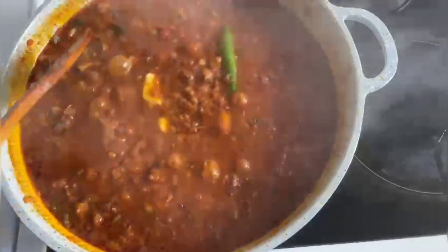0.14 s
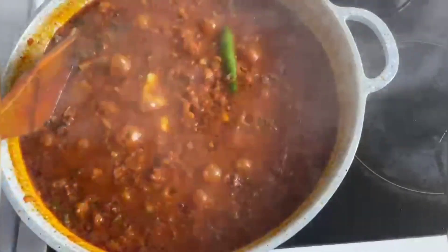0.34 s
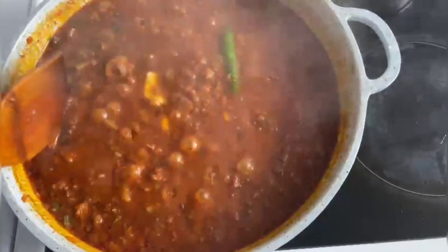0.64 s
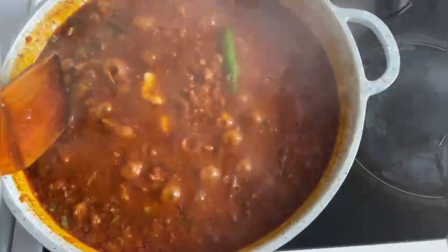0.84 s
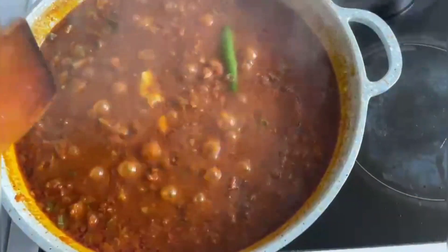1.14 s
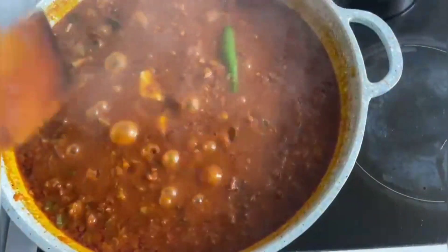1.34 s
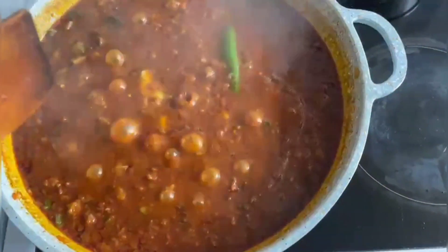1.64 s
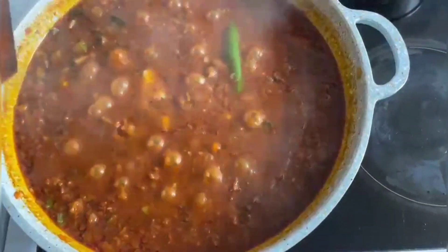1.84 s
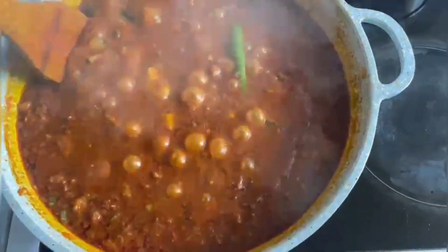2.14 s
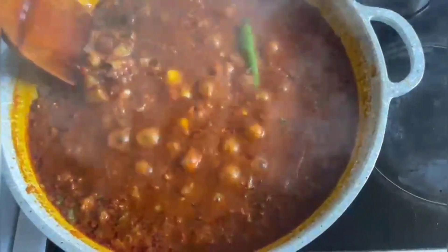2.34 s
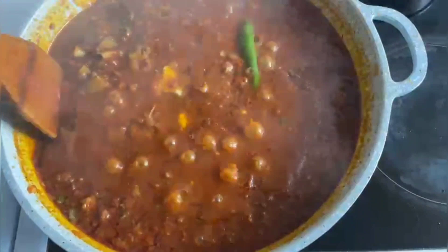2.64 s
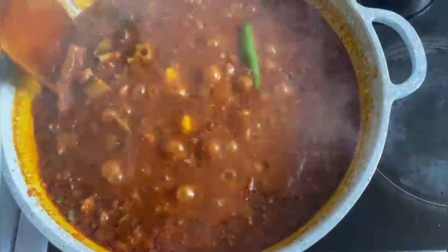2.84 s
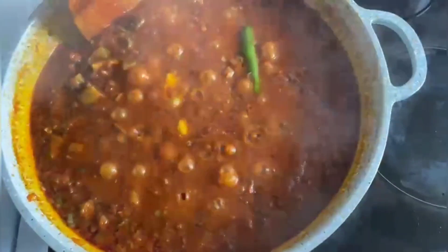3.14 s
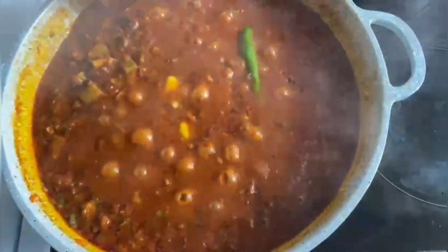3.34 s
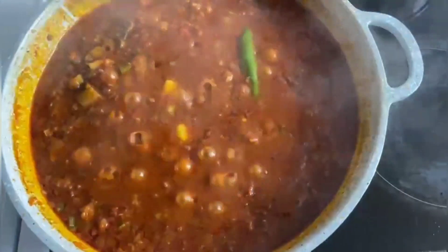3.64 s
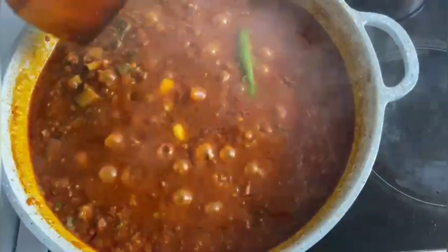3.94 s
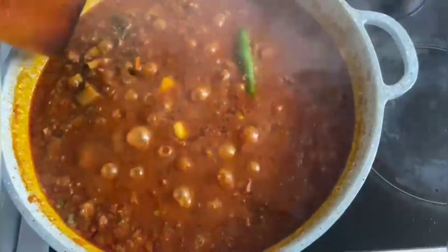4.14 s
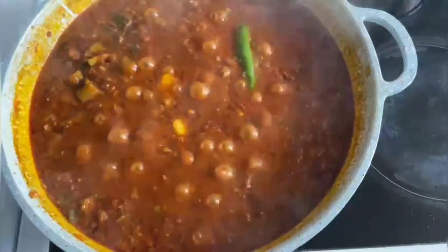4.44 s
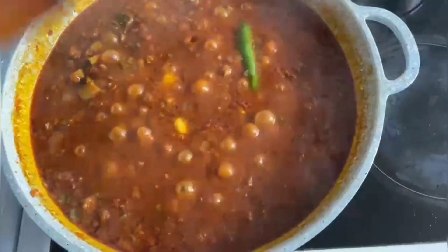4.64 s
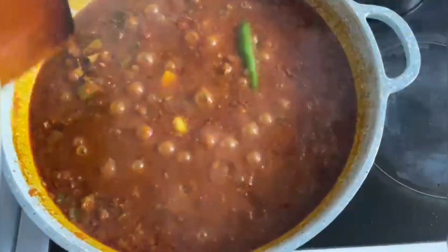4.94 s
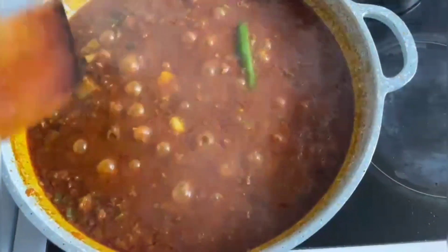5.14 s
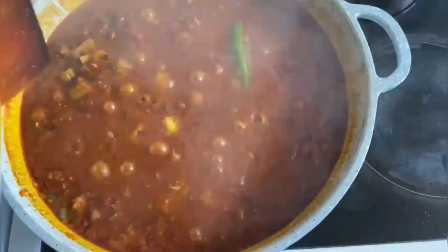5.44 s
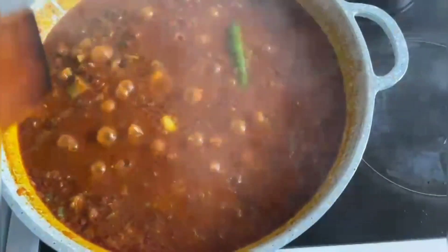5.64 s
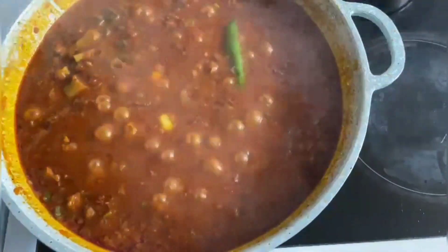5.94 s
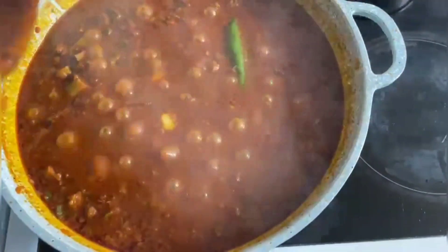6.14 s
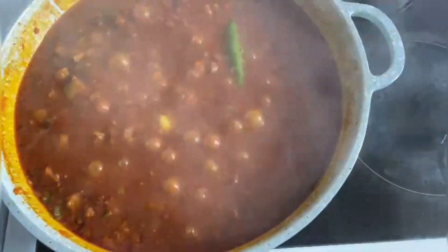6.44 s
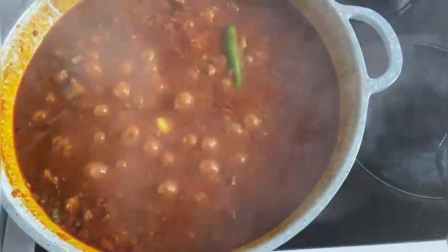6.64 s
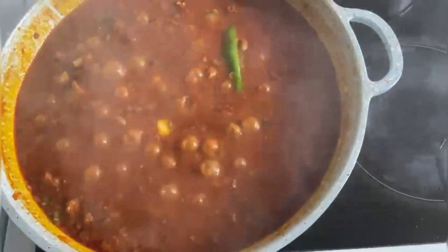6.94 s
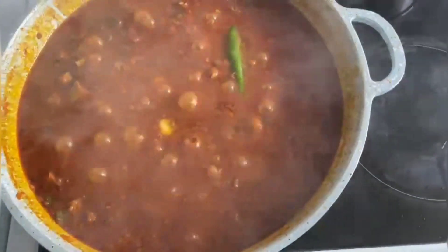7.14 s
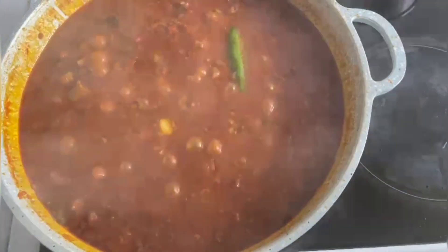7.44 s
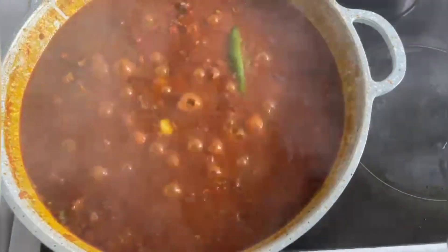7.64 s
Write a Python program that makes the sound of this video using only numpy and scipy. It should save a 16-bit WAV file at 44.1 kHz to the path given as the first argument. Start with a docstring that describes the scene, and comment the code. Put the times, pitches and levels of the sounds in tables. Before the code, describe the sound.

A thick sauce simmers close to a stereo microphone in a small kitchen. Countless little bubbles seethe and patter without pause while larger ones burst as short, wet, damped pops at uneven intervals. Spits crackle on hot metal, mostly early on, and a few big bubbles slump in low blops around two to three seconds. A low motor hum and soft rumble of air continue beneath.

```python
"""Thick stew simmers in a wide pan, close to a two-port microphone in a small kitchen.
Bubbles burst as short damped notes, and big ones slump in a falling blop with a spray of noise.
Sauce spits and fizzes at the hot metal as noise bursts and tiny ticks, over a noise bed of seething.
The pan wall and the room throw the bursts back, and an appliance hums in its own rumble of air."""
import sys
import numpy as np
from scipy import signal
from scipy.fft import rfft, irfft, next_fast_len
from scipy.io import wavfile

SR = 44100
rng = np.random.default_rng(int(sys.argv[2]) if len(sys.argv) > 2 else 0)


def put_to_file(sound):
    """Save the sound as 16-bit audio at rate SR, in the file named by the first command-line argument."""
    columns = np.atleast_2d(sound).T  # one column per channel
    safe = np.clip(columns, -1, 1)
    whole_steps = np.round(safe * 32767)
    wavfile.write(sys.argv[1], SR, whole_steps.astype(np.int16))


N = 344403
TIME = np.arange(N) / SR  # s
TEAR = 0.5  # strength of the smack of a tearing film beside the bubble's note
TRAIL_S = 0.024  # s, spread of the smaller bursts that follow a pop or a spit


def amp(db):
    """Decibels to gain."""
    return 10 ** (np.asarray(db) / 20)


def unit(x):
    """Scales to an rms of 1."""
    return x / np.sqrt(np.mean(x ** 2) + 1e-20)


def read(points, hz):
    """Reads a table on a log-frequency axis."""
    f, value = np.transpose(points)
    return np.interp(np.log(hz + 1), np.log(f + 1), value)


def bins(x):
    """Frequencies of the spectrum of x."""
    return np.fft.rfftfreq(x.shape[-1], 1 / SR)


def colour(x, points, share=1):
    """Filters by a share of a (frequency [Hz], gain [dB]) table."""
    length = x.shape[-1]
    size = next_fast_len(length, True)
    gain = amp(share * read(points, np.fft.rfftfreq(size, 1 / SR)))
    return irfft(rfft(x, size) * gain, size)[..., :length]


def add(track, s, sound):
    """Mixes a sound into a track at time s."""
    part = track[max(round(s * SR), 0):][:len(sound)]
    part += sound[:len(part)]


def drift(per_s):
    """A random wander of rms 1, in straight lines between per_s random points a second."""
    return unit(np.interp(TIME * per_s, np.arange(4096), rng.standard_normal(4096)))


def heat(column):
    """Boiling (column 1) or frying (column 2) in dB: a slow course with brief random surges."""
    # how hard the pan works, about its average: (time [s], boiling [dB], frying [dB])
    course = np.array([(0.0, -0.5, 0), (0.8, -0.4, 1), (1.05, 0.5, 1), (2.6, 0.5, 0.6), (3.8, 0.1, 1.5),
                       (4.4, -0.7, 2.24), (6.4, -0.9, -0.1), (7.2, -0.55, 0)])
    surge_db, surges_per_s = 0.8, 45
    return np.interp(TIME, course[:, 0], course[:, column]) + surge_db * drift(surges_per_s)


def diffuse(size):
    """White noise at both ports: alike in bass and treble, mostly unrelated between, phase-shifted on the left."""
    # likeness of diffuse sound at the two ports: (frequency [Hz], likeness [0-1])
    likeness = [(40, 0.99), (100, 1), (260, 0.99), (400, 0.25), (2500, 0.05), (4300, 0.07), (5200, 1)]
    # phase of the left port behind the right in diffuse noise, negative where it leads:
    # (frequency [Hz], phase [radians])
    left_phase = [(40, 0), (500, -0.5), (1500, 0.6), (3300, 2.5), (5300, 6.5), (6200, 8), (6900, 8.5),
                  (8800, 9.5), (9900, 12.5)]
    noise = rng.standard_normal((2, next_fast_len(size, True)))
    (shared, other), hz = rfft(noise), bins(noise)
    same = np.clip(read(likeness, hz), 0, .996)
    left = shared * np.exp(-1j * read(left_phase, hz))
    right = same * shared + np.sqrt(1 - same ** 2) * other
    return irfft([left, right], noise.shape[-1])[:, :size]


def bubble(hz, cycles, glide, opening=.5, tear=0):
    """A film tears with a wet smack and the cavity rings; pitch and damping rise as the hole widens."""
    tear_s = 0.00013  # s, time scale of the smack
    turns = np.arange(int(4 * cycles / hz * SR) + 2) * hz / SR  # elapsed cycles
    swell = (1 - np.exp(-turns / opening)) * np.exp(-(turns / cycles) ** 1.5)
    pitch = 1 + glide * (np.tanh(turns / cycles) - .5)
    note = swell / swell.max() * np.sin(2 * np.pi * np.cumsum(pitch) * hz / SR)
    age = np.maximum(turns - .25, 0) / hz / tear_s  # the smack starts a quarter cycle in
    smack = np.e * age * (1 - age / 2) * np.exp(-age) * 2
    return note + tear * smack


def burst(spots, where, s, db, hz, cycles, glide, opening, tear=0):
    """Sounds each bubble on the track of its own spot in the pan; the film tears inwards or outwards."""
    out = np.zeros((spots, N))
    smacks = tear * rng.choice([-1, 1], len(s))
    own_spot = (where * spots).astype(int)
    bubbles = zip(own_spot, s, amp(db), smacks, hz, np.maximum(cycles, .5), glide)
    for spot, start, gain, smack, *shape in bubbles:
        add(out[spot], start, gain * bubble(*shape, opening, smack))
    return out


def path(lag, wall_db, room_db, wall_s=.004, size=8192, count=4):
    """From one spot to both ports: direct sound, echoes off the pan wall and hob, the kitchen's tail."""
    # kitchen reverberation: (frequency [Hz], time to fall by 60 dB [s])
    kitchen = [(1000, 0.18), (8000, 0.09)]
    port_lag = 0.00026  # s, an echo's delay between the ports reaches twice this either way
    hz = np.fft.rfftfreq(size, 1 / SR)
    near = np.exp(-2j * np.pi * hz * np.array([[lag], [0]]))
    for late, side, sign in rng.uniform(-1, 1, (count, 3)):
        delay = wall_s * (1 + 0.8005 * late) + np.array([[2 * port_lag * side], [0]])
        near = near + np.sign(sign) * amp(wall_db) * np.exp(-2j * np.pi * hz * delay)
    f, t, z = signal.stft(diffuse(size), SR, nperseg=256)
    decay = amp(-60 * t / read(kitchen, f)[:, None])
    tail = signal.istft(z * decay, SR, nperseg=256)[1][:, :size]
    tail *= np.minimum(TIME[:size] / .006, 1)  # builds up over 6 ms
    return irfft(near) + amp(room_db) * tail / np.linalg.norm(tail[0])


def heard(spots, lag, lag_spread, wall_db, room_db):
    """A row of spots across the pan, each with its own delay between the ports."""
    lags = lag * (1 + lag_spread * np.linspace(-1, 1, len(spots)))
    return sum(signal.oaconvolve(spot[None], path(own, wall_db, room_db), axes=1)[:, :N]
               for spot, own in zip(spots, lags))


def seethe(boil, fry, level_db=-51.0, flicker_db=2.0, split_hz=3000):
    """Bubbles too small to tell apart: body follows boiling, hiss frying; the top only crackles."""
    # the blended seething of countless tiny bubbles: (frequency [Hz], relative level [dB])
    spectrum = [(100, -36), (250, -5), (420, 7), (580, 1), (790, 11), (1100, -6), (3000, -11), (4200, -0.5),
                (5000, -8), (6100, -1.5), (7000, -12.5), (8600, -3), (9600, -9.5), (10800, -9),
                (11800, -16.5)]
    noise = unit(colour(diffuse(N), spectrum))
    body = signal.sosfiltfilt(signal.butter(2, split_hz, fs=SR, output="sos"), noise)
    top = colour(noise, [(6500, -40), (9000, 0)])
    hiss = noise - body - top
    boiling = amp(1.3 * boil + flicker_db * drift(70))
    crackle = amp(flicker_db * drift(130))
    return amp(level_db) * (body * boiling + (hiss * amp(1.6 * fry) + top) * crackle)


def appliance(air_db=-52.0, waver=0.14, slip=0.095, port_phase=0.052):
    """A motor's wavering hum, a little later at the left port, in a rumble of air; it dips once."""
    # tone of the motor: (frequency [Hz], level before the waver [dB rms])
    hz, db = (93.2, -49.3)
    # brief dip of the hum: (time [s], length [s], level change [dB])
    s, length, dip_db = (2.94, 0.14, -10)
    # air noise of the appliance: (frequency [Hz], relative level [dB])
    rumble = [(24, -13), (47, 0), (90, 5), (117, -0.5), (129, 10), (139, 1), (179, 7.5), (196, -12.5),
              (234, 2), (300, -5), (4000, -130.5)]
    level = amp(db + dip_db * np.exp(-(2 * (TIME - s) / length) ** 2))
    phase = 2 * np.pi * hz * TIME + slip * drift(3.8) - np.array([[port_phase], [0]])
    tone = level * np.sqrt(2) * np.sin(phase)
    air = amp(air_db) * unit(colour(diffuse(N), rumble))
    return tone * (1 + waver * drift(8.3)) + air


def simmer(spots, boil, level_db=-49.5, spread_db=1.0, ring=2.72, glide=0.18, count=4500):
    """A crowd of lesser bubbles; the large, low ones are damped most by the thick sauce."""
    # typical strength of a small bubble by its pitch: (frequency [Hz], relative level [dB])
    strength = [(170, 3), (250, -3), (340, -2.5), (450, -2.5), (580, -7.5), (720, 5), (900, 4), (1200, 3),
                (1750, 4), (2050, 0.5), (2500, 3), (4000, 3.5)]
    when, where, size, force, wetness, rise = rng.random((count, 6)).T
    hz = 170 * 24 ** (size ** .75)
    cycles = ring * (.5 + wetness) * np.minimum(hz / 1200, 2) ** .6
    stray_db = spread_db * np.minimum(-np.log(1 - force), 2.3)
    db = read(strength, hz) + stray_db + boil[(when * N).astype(int)]
    tear = TEAR * np.minimum(hz / 700, 1)  # low bubbles smack less
    out = burst(spots, where, when * N / SR, db, hz, cycles, glide * rise, opening=1.4, tear=tear)
    return amp(level_db) * out / out.sum(0).std()


def fizz(spots, fry, level_db=-55.5, spread_db=4.5, ring=2.47, count=4000):
    """Tiny bubbles frying at the rim, each a tick about a millisecond long."""
    # level of the fizzing ticks by pitch, almost silent from 6 to 9.5 kHz:
    # (frequency [Hz], relative level [dB])
    tick_level = [(2800, 17.5), (4200, 12.5), (5000, 12.5), (5600, 12.5), (6100, -32), (9500, -33),
                  (10300, 8)]
    when, where, size, force, wetness = rng.random((count, 5)).T
    hz = 2800 * 3.8 ** size
    cycles = ring * (.5 + wetness) * hz / 5000
    stray_db = spread_db * np.minimum(-np.log(1 - force), 3.0)
    db = read(tick_level, hz) + stray_db + fry[(when * N).astype(int)]
    out = burst(spots, where, when * N / SR, db, hz, cycles, np.zeros(count), opening=22.0)
    return amp(level_db) * out / out.sum(0).std()


def blips(spots, boil, level_db=-43.0, spread_db=0.4, low_hz=760, high_hz=1950,
          ring=4.54, glide=0.13, count=220):
    """Middle-sized bubbles that pop distinctly, one after another at uneven intervals."""
    when, where, size, force, wetness = rng.random((count, 5)).T
    s = (np.arange(count) + when) / count * N / SR
    hz = low_hz * (high_hz / low_hz) ** size
    db = level_db + spread_db * (2 * force - 1) + np.interp(s, TIME, boil)
    cycles = ring * (.5 + wetness)
    return burst(spots, where, s, db, hz, cycles, glide * wetness, opening=1.15, tear=TEAR)


def pops(spots, level_db=0.0, glide=0.075, trail_db=-10, trail_ring=2.4, sag_octaves=0.8, count=2):
    """The large bubbles; each tears open weaker neighbours, the later the lower as the crater widens."""
    # the loudest bursts: (time [s], note level at the pan [dB], pitch [Hz], ring length [cycles])
    loudest = [(0.038, -36.5, 1080, 5.0), (0.048, -37.5, 390, 1.3), (0.127, -33.0, 1410, 2.0),
               (0.158, -36, 1570, 2.0), (0.366, -31.5, 3280, 3.2), (0.435, -39, 990, 8.0),
               (0.457, -37.5, 1190, 8.0), (0.525, -35.0, 900, 3.2), (0.538, -34.0, 1190, 2.0),
               (0.556, -32.0, 900, 1.3), (0.557, -28.5, 3580, 3.2), (0.577, -38.5, 1430, 5.0),
               (0.668, -36, 2500, 8.0), (0.717, -36, 2110, 3.2), (0.862, -33.5, 2290, 3.2),
               (0.878, -34.5, 1580, 2.0), (0.922, -35, 2480, 3.2), (1.017, -35, 684, 1.3),
               (1.021, -34, 1580, 8.0), (1.048, -33, 990, 2.0), (1.072, -32.5, 2940, 5.0),
               (1.107, -32, 900, 1.3), (1.341, -32.5, 2270, 3.2), (1.356, -36.5, 1310, 8.0),
               (1.455, -33.5, 1190, 3.2), (1.608, -37.0, 1880, 3.2), (1.616, -38, 1720, 8.0),
               (1.679, -32.5, 1430, 3.2), (1.785, -35, 1720, 5.0), (1.796, -36, 1720, 3.2),
               (1.925, -30, 1400, 1.7), (1.937, -36, 1190, 2.0), (2.005, -33.0, 1720, 2.0),
               (2.054, -30.5, 1500, 1.2), (2.123, -36, 2070, 3.2), (2.159, -36.5, 1880, 3.2),
               (2.17, -32.5, 2490, 5.0), (2.215, -33.5, 1560, 3.2), (2.327, -27.5, 2470, 2.4),
               (2.333, -34, 2010, 1.2), (2.516, -33, 980, 1.3), (2.555, -39, 1305, 8.0),
               (2.574, -31, 900, 1.3), (2.799, -38.5, 747, 6.0), (2.823, -32, 1000, 1.3),
               (2.957, -36.5, 1720, 3.2), (3.009, -39, 2280, 8.0), (3.038, -39, 904, 8.0),
               (3.057, -38, 990, 8.0), (3.059, -29.5, 2270, 1.3), (3.129, -37, 1300, 2.0),
               (3.213, -35, 895, 2.0), (3.237, -35, 810, 1.3), (3.39, -32.5, 2680, 3.2),
               (3.404, -36.5, 1080, 2.0), (3.597, -32.5, 2730, 2.0), (3.783, -36.5, 1295, 8.0),
               (3.907, -37.5, 1880, 3.2), (4.101, -35.5, 2970, 5.0), (4.178, -35.5, 880, 3.0),
               (4.597, -34, 2700, 3), (4.665, -30.5, 3260, 2.0), (4.709, -34.5, 1720, 2.0),
               (4.718, -29, 1900, 3.2), (4.896, -30.0, 2000, 2.5), (5.248, -33, 2200, 2.5),
               (5.259, -33.5, 2900, 2.0), (5.61, -30.5, 1860, 3.2), (5.655, -36.0, 2260, 3.2),
               (5.672, -31.5, 1880, 1.3), (5.794, -35.5, 2070, 2.0), (5.901, -33.5, 1530, 5.0),
               (5.918, -34, 2280, 8.0), (5.926, -33.5, 1560, 8.0), (5.978, -34.5, 2490, 3.2),
               (6.403, -36, 2460, 3.2), (6.552, -36, 840, 1.6), (6.797, -32.0, 1570, 5.0),
               (6.939, -38, 1700, 5.0), (7.115, -31, 2060, 1.3), (7.126, -37, 2070, 5.0),
               (7.188, -34, 1720, 5.0), (7.4, -36.5, 1880, 3.2), (7.45, -38.0, 835, 6.0),
               (7.667, -39.5, 1890, 8.0), (7.745, -38.5, 1720, 8.0)]
    s, db, hz, cycles = np.transpose(loudest)
    draws = rng.random((len(loudest), 2 + count)).T
    where, rise = draws[:2]
    out = burst(spots, where, s, db + level_db, hz, cycles, glide * rise, opening=0.56, tear=TEAR)
    for late in draws[2:]:
        near_hz = hz * 2 ** (-sag_octaves * late)
        ring = trail_ring * np.sqrt(near_hz / 1200)
        start = s + cycles / hz + TRAIL_S * late
        out += burst(spots, where, start, db + trail_db, near_hz, ring, glide * rise,
                     opening=0.56, tear=TEAR)
    return out


def snap(decay_s, size=256):
    """A droplet flashes to steam: a burst of noise that dies away within a few milliseconds."""
    noise = rng.standard_normal(size) * np.exp(-np.arange(size) / SR / decay_s)
    return noise / np.linalg.norm(noise)


def spits(spots, level_db=10.5, decay_s=0.0012, trail_db=-7, count=3):
    """Droplets of sauce that hit the hot metal and scatter into smaller ones."""
    # the sharpest spits of hot sauce: (time [s], relative level [dB])
    sharpest = [(0.057, -42), (0.158, -46), (0.313, -45.5), (0.707, -41), (0.933, -41.5), (1.123, -41.5),
                (1.794, -41), (1.876, -46.5), (4.12, -46), (5.548, -45)]
    # colour of a spit: (frequency [Hz], gain [dB])
    spit_colour = [(300, -1), (1500, 21), (4300, 20), (7500, 13.5), (11500, 13.5)]
    out = np.zeros((spots, N))
    for s, db in sharpest:
        spot = out[rng.integers(spots)]
        drops = [(s, db)] + [(s + TRAIL_S * late, db + trail_db) for late in rng.random(count)]
        for start, drop_db in drops:
            add(spot, start, amp(drop_db + level_db) * colour(snap(decay_s), spit_colour))
    return out


def splats(spots, level_db=0.0, fall=0.249, spray_db=-16, spray_s=0.01):
    """A big bubble tears with a wet spray, and its note staggers down as the crater opens."""
    # big bubbles that split and slump:
    # (time [s], relative level [dB], first pitch [Hz], last pitch [Hz], length [s])
    slumps = [(1.937, -39, 560, 150, 0.024), (2.047, -37.5, 210, 150, 0.024), (2.235, -46, 200, 140, 0.03),
              (2.3285, -30.5, 1400, 550, 0.0028), (2.817, -46, 380, 310, 0.036),
              (3.059, -32.5, 1000, 310, 0.0072), (3.067, -33.5, 280, 224, 0.014)]
    slump_wobble = 0.15  # octaves rms by which the sagging sauce shakes the note
    out = np.zeros((spots, N))
    t = TIME[:2048]
    for (s, db, first_hz, last_hz, length), spot in zip(slumps, rng.integers(spots, size=len(slumps))):
        age = np.arange(0, length, 1 / SR) / length
        wobble, flap = drift(350)[:len(age)], drift(250)[:len(age)]
        sag = (last_hz / first_hz) ** (1 - np.exp(-age / fall))
        hz = first_hz * sag * 2 ** (slump_wobble * wobble)
        turns = np.cumsum(hz) / SR
        swell = (1 - np.exp(-4 * turns)) * (1 - age ** 3) ** 2 * (1 + .4 * np.tanh(flap))
        spray_colour = [(1.3 * first_hz, 0), (2.9 * first_hz, -24), (12000, -50)]
        spray = unit(colour(rng.standard_normal(len(t)), spray_colour)) * np.exp(-t / spray_s)
        add(out[spot], s, amp(db + level_db) * swell * np.sin(2 * np.pi * turns))
        add(out[spot], s, amp(db + spray_db) * spray)
    return out


def gush(roughness_db=0.5):
    """A pocket of steam vents through the sauce: a short wet sputter of noise that swells and dies."""
    # the vent: (time [s], length [s], level before the swell [dB])
    s, length, db = (2.785, 0.075, -42.5)
    swell = np.sin(np.pi * np.clip((TIME - s) / length, 0, 1))
    sputter = amp(roughness_db * drift(300))
    wet_colour = [(60, -33), (330, -3), (1500, -11), (5000, -8), (11000, -18)]
    return amp(db) * swell * unit(sputter * colour(diffuse(N), wet_colour))


def stew(boil, fry, count=8):
    """Larger bubbles burst in the open middle, louder on the left; lesser ones all over; frying at the rim."""
    large = pops(count) + splats(count) + blips(count, boil)
    middle = heard(large, lag=.0001, lag_spread=.3, wall_db=-16, room_db=-9)
    around = heard(simmer(count, boil), lag=0.00012, lag_spread=0.27, wall_db=-7.5, room_db=-3.5)
    frying = fizz(count, fry) + spits(count)
    rim = heard(frying, lag=.000188, lag_spread=.04, wall_db=-19, room_db=-8)
    return middle * amp([[.7], [-.7]]) + around + rim


def scene():
    """The pan and the hum together; shared surges drive the small bubbles and their blended seething."""
    boil, fry = heat(1), heat(2)
    return stew(boil, fry) + seethe(boil, fry) + gush() + appliance()


def record(dry):
    """The microphone: each port's colour, equal in the bass, then the band limit."""
    # the ports differ in colour: (frequency [Hz], left minus right [dB])
    tilt = [(340, 0.5), (480, -2.5), (590, -1), (690, -5), (830, 1), (970, 4), (1300, -1), (1750, 3),
            (2300, -0.5)]
    edge_hz = 11700
    ports = colour(dry, [(200, 0)] + tilt, np.array([[.5], [-.5]]))
    lowpass = signal.firwin(301, edge_hz, window=("kaiser", 9), fs=SR)
    return signal.oaconvolve(ports, lowpass[None], "same")


dry = scene()
out = record(dry)
put_to_file(out)
```